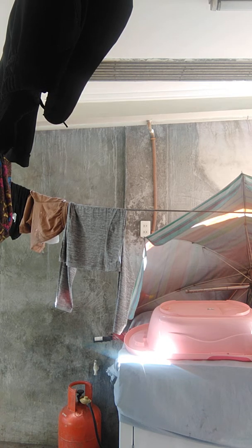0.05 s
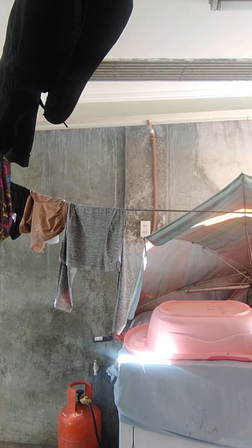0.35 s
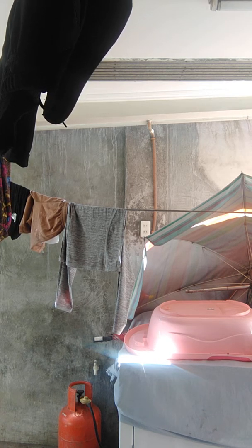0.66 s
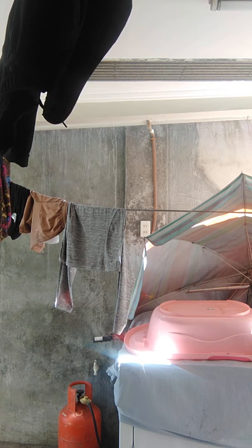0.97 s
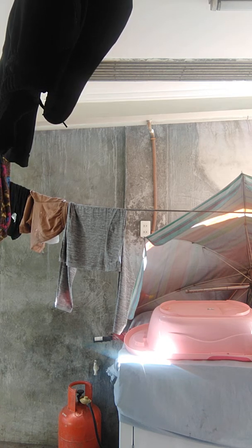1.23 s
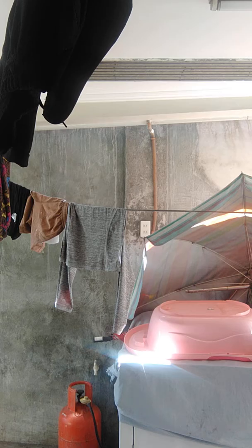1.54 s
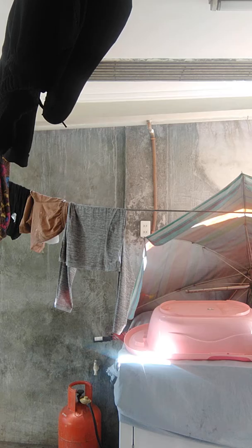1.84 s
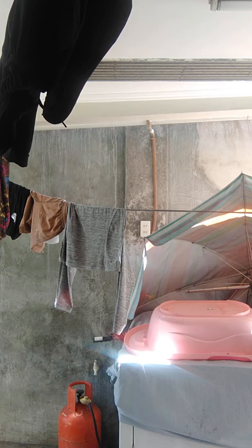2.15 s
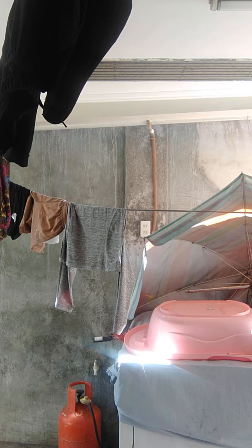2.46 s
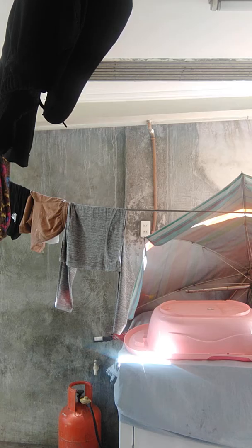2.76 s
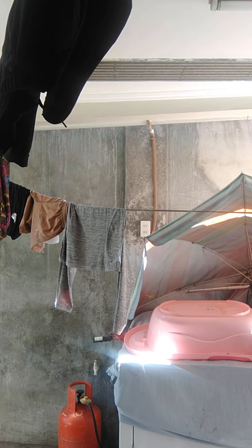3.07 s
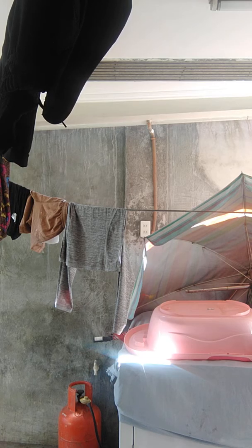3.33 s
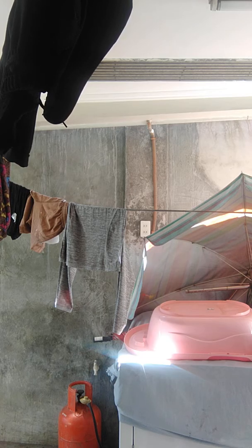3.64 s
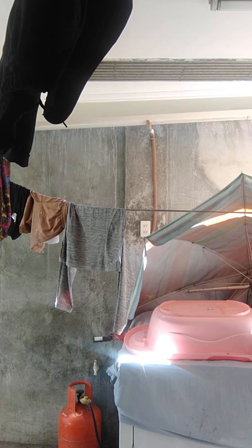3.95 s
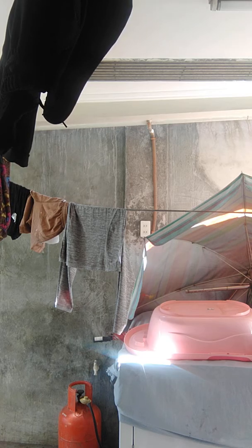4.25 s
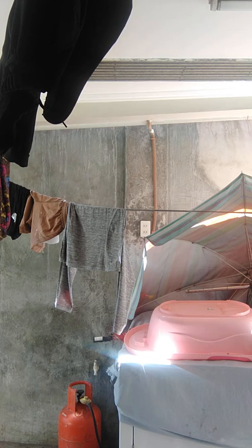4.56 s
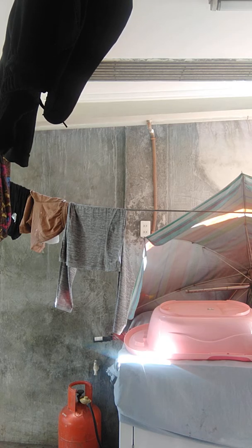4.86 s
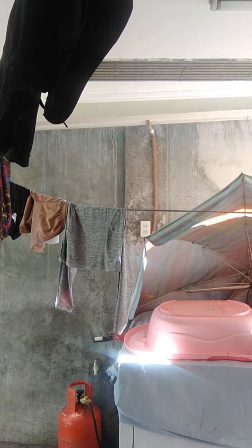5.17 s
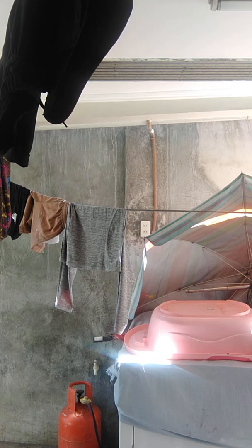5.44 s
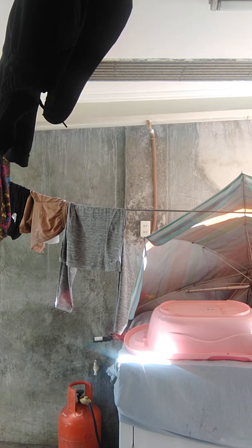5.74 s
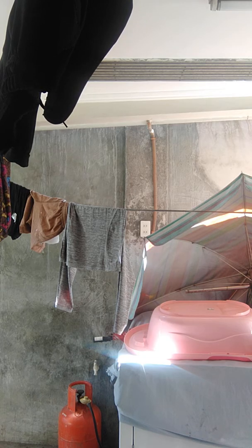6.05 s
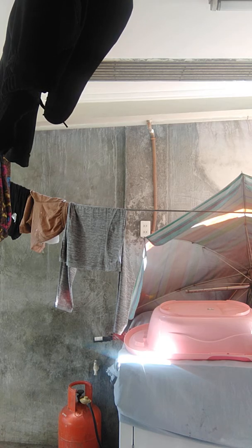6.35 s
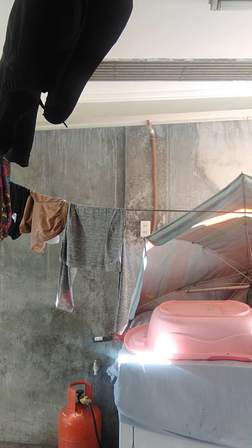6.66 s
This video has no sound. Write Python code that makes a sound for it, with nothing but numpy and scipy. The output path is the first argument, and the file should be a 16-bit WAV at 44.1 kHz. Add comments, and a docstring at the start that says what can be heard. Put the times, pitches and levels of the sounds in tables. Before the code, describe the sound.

Water splashes from the start in uneven spurts, like washing by hand, with sharp slaps, ringing bubbles and a few low glugs in a tub. It eases around 1 second into lighter splashes and a thin, hissing trickle. Something hollow scrapes twice with a slight squeak, low at about 1.5 seconds and higher at 1.8. The splashing picks up at 2 seconds and is fullest from about 2.7 to 3.4, when a heavier stream makes the basin ring. Irregular slaps, bursts of froth and soft glugs continue, with another deeper spurt near 6 seconds and bright splashes until about 7. Stray drops plink on the floor throughout, and a few very faint, brief whistles sound far off over a quiet low rumble. Bare concrete walls add a short echo, and a small microphone gives the water a crisp, bright edge.

```python
"""Water slaps down and dribbles away in uneven spurts: washing by hand in a small concrete yard.
Each spurt traps ringing bubbles, which get smaller and higher as it thins. Froth bursts in the stream,
big air pockets glug low in a tub and a thin trickle runs on. Stray drops plink on the floor,
something hollow scrapes twice and faint whistles sound far off. Bare walls echo it all,
and a small microphone gives the splashes a peak near 8.5 kHz."""
import sys
import numpy as np
from scipy import signal
from scipy.fft import rfft, irfft, next_fast_len
from scipy.io import wavfile
from scipy.ndimage import uniform_filter1d

SR = 44100
rng = np.random.default_rng(int(sys.argv[2]) if len(sys.argv) > 2 else 0)


def materialize(psi):
    """Save the field psi as 16-bit PCM at rate SR to the path in sys.argv[1].

    A 1-D psi becomes a single channel; in a 2-D psi each row is a channel.
    """
    bounded = np.clip(np.atleast_2d(psi).T, -1, 1)
    quanta = np.round(bounded * 32767).astype(np.int16)
    wavfile.write(sys.argv[1], SR, quanta)


N = 304290

# Events. Their levels are relative: the functions turn them up or down for the mix.
# faint whistles and thin rings: t/s, length/s, f/Hz, level/dB
WHISTLES = [(0, 0.022, 1288, -61), (.09, 0.13, 1285, -62.5), (.77, 0.045, 1291, -65),
            (1.128, 0.014, 1035, -60), (1.39, 0.11, 6790, -61), (2.58, 0.023, 1097, -68.5),
            (2.64, 0.048, 1093, -77), (2.98, 0.032, 1084, -64.5), (5.52, 0.101, 1222, -73.5),
            (5.9, 0.23, 1468, -62.5), (6.72, 0.05, 1094, -60), (6.75, 0.18, 8450, -59.5)]
# two scrapes, a low one then a higher one: t/s, rise/s, length/s, level/dB
SCRAPES = [(1.465, 0.051, 0.14, -49), (1.768, 0.0077, 0.044, -47)]
# tones that sing out in the scrapes: t/s, length/s, f/Hz, level/dB
SQUEAKS = [(1.448, .035, 495, -52), (1.46, .04, 1190, -60), (1.465, .035, 2660, -61),
           (1.508, .05, 690, -44), (1.515, .05, 485, -46), (1.57, .13, 697, -49), (1.78, .13, 2850, -58),
           (1.9, .1, 1455, -66)]
# runs of big air pockets in the tub: t/s, length/s, rough f/Hz, level/dB
GLUG_RUNS = [(0.149, .03, 164.6, -43), (0.242, .43, 236.7, -49.5), (0.363, .03, 144.6, -44),
             (.532, .03, 147, -58.5), (.992, .03, 139.6, -54.5), (1.992, .03, 94, -58),
             (2.785, .03, 407, -52.5), (2.943, .24, 253, -60), (2.985, .03, 253, -50),
             (3.427, .03, 260, -55), (3.599, .03, 564, -61.5), (3.605, .14, 250, -51.5),
             (3.939, .07, 255, -60.5), (4.277, .14, 237, -60), (4.719, .08, 85.4, -59),
             (4.804, .08, 233, -59.5), (5.196, .2, 246.4, -52), (5.33, .07, 152, -58),
             (6.243, .03, 261.4, -50.5), (6.379, .03, 236, -54), (6.586, .03, 230, -55)]
# stretches of thin trickle: t/s, length/s, level/dB, ticks over the hiss/dB
TRICKLES = [(0, 0.69, -57.5, -3), (0.71, 0.85, -64.5, 4), (2.093, 2.8, -60.5, -4.5),
            (5.557, 1.3, -64, -6.5)]
# bursts of froth: t/s, rough length/s, f/Hz, pitch spread each way/octaves, level/dB
FROTH_BURSTS = [(.003, .03, 4960, 0.063, -62.5), (0.071, 0.017, 3620, 0.13, -55),
                (0.122, 0.034, 3620, 0.18, -50.5), (0.278, .02, 3820, 0.2, -53),
                (0.36, 0.041, 3340, 0.19, -54), (0.432, 0.022, 3380, 0.27, -56),
                (0.703, 0.01, 4980, 0.034, -63.5), (0.743, 0.014, 6300, 0.042, -55),
                (0.766, 0.023, 3720, 0.024, -62), (0.944, 0.019, 3340, .15, -70),
                (0.96, 0.065, 4970, 0.027, -69), (1.142, 0.018, 3840, 0.013, -75),
                (1.222, 0.022, 5650, 0.028, -68), (1.218, 0.011, 2960, 0.13, -58.5),
                (1.219, .012, 4190, 0.09, -56), (1.215, 0.015, 7130, 0.027, -52.5),
                (1.345, .025, 4960, 0.17, -49.5), (1.574, .07, 3700, .25, -59),
                (1.597, 0.017, 3460, 0.21, -51.5), (2.092, 0.028, 3500, 0.4, -49.5),
                (2.198, .02, 1990, 0.1, -63.5), (2.197, 0.039, 3400, 0.24, -60),
                (2.256, 0.029, 3760, 0.084, -58), (2.287, 0.063, 3190, 0.31, -51.5),
                (2.313, .04, 2300, 0.091, -57), (2.441, 0.022, 3830, 0.11, -50),
                (2.539, 0.066, 3040, 0.305, -49), (2.728, 0.095, 1950, 0.015, -65),
                (2.759, 0.061, 2690, 0.25, -69), (2.921, 0.068, 1980, 0.014, -65),
                (3.04, 0.07, 2460, 0.082, -55), (3.12, .03, 2280, 0.037, -56),
                (3.292, 0.013, 3570, 0.21, -48.5), (3.387, 0.013, 3100, 0.14, -60.5),
                (3.409, 0.01, 5500, 0.42, -39.5), (3.478, 0.018, 4320, 0.085, -49),
                (3.594, 0.041, 3210, 0.48, -64.5), (3.625, 0.016, 6600, 0.067, -46.5),
                (3.712, .012, 6300, 0.16, -46), (3.845, 0.0074, 3600, 0.18, -55),
                (3.88, 0.028, 4020, 0.36, -47), (3.936, .015, 3470, 0.24, -40.5),
                (3.984, 0.014, 3700, 0.063, -56), (4.019, 0.017, 3570, 0.23, -49),
                (4.339, 0.018, 3600, 0.056, -57.5), (4.381, 0.023, 2480, 0.17, -55),
                (4.383, 0.022, 3530, 0.1, -54), (4.432, 0.021, 5720, 0.087, -46),
                (4.502, 0.023, 4750, 0.05, -60), (4.608, 0.045, 2930, 0.081, -62),
                (4.627, .03, 4330, 0.33, -53.5), (4.726, 0.089, 2030, 0.019, -66),
                (4.745, 0.016, 6020, 0.2, -42), (4.755, .045, 3276, 0.047, -57),
                (4.87, 0.029, 1954, 0.031, -65), (4.871, 0.016, 3700, 0.049, -58.5),
                (4.904, 0.031, 3940, 0.12, -51), (4.968, .045, 3780, 0.077, -53),
                (5.085, 0.016, 4040, 0.25, -63), (5.152, 0.042, 2650, 0.044, -72),
                (5.658, .018, 4600, 0.13, -51), (5.961, .035, 3130, 0.29, -44.5),
                (6.03, 0.018, 4450, 0.34, -47), (6.294, 0.04, 4900, 0.18, -42),
                (6.395, 0.038, 2620, 0.19, -59), (6.518, .04, 5540, 0.083, -52),
                (6.743, .06, 5500, 0.11, -65.5)]
# spurts of falling water: t/s, length/s, level/dB, f/Hz of the largest bubbles
SPURTS = [(0, 0.0079, -40.5, 8400), (0.124, 0.27, -39.5, 4700), (0.433, 0.05, -36.5, 4160),
          (0.563, 0.022, -41, 5400), (0.745, 0.018, -37.5, 5960), (0.944, 0.022, -44.5, 6950),
          (1.064, 0.13, -48, 8550), (1.305, 0.0061, -33.5, 10100), (1.347, 0.088, -46, 4200),
          (1.426, 0.29, -49, 8400), (1.596, 0.026, -38, 5940), (2.06, 0.23, -41, 7900),
          (2.312, 0.11, -41, 2750), (2.545, 0.039, -37.5, 7440), (2.612, 0.057, -43, 2540),
          (2.699, 0.086, -38.5, 2870), (2.718, 0.17, -37.5, 2765), (2.949, 0.11, -34.5, 2780),
          (3.046, 0.017, -35.5, 2330), (3.106, 0.092, -32, 3530), (3.16, 0.37, -42, 3900),
          (3.584, 0.25, -41, 5960), (3.748, 0.095, -41, 3820), (3.885, 0.12, -40.5, 3200),
          (4.079, 0.21, -45.5, 8950), (4.234, 0.15, -39.5, 5230), (4.429, 0.22, -43.5, 5430),
          (4.74, 0.14, -41.5, 5150), (4.909, 0.077, -41.5, 4030), (5.127, 0.046, -37, 7040),
          (5.261, 0.1, -36, 3430), (5.496, 0.13, -42.5, 4010), (5.653, 0.08, -49, 4740),
          (5.737, 0.065, -43, 6850), (5.938, 0.015, -46.5, 2970), (5.96, 0.15, -36.5, 2720),
          (6.13, 0.085, -40, 4120), (6.25, 0.051, -33.5, 4800), (6.383, 0.064, -41.5, 4200),
          (6.676, 0.13, -46, 7440)]
# slaps of water and single drops ticking on the floor: t/s, level/dB, crack level/dB, f/Hz of the largest
# bubbles
SLAPS = [(.013, -54.5, 32, 7900), (.062, -37.5, 0, 7500), (.199, -31, 0, 6500), (.218, -44, 18, 6500),
         (.244, -41.5, 25.5, 7700), (.278, -34.5, 0, 3340), (.328, -27.5, 16.5, 7000),
         (.44, -25.5, -4, 4360), (.472, -38.5, 19, 4930), (.572, -30.5, 14.5, 5350),
         (.708, -39, 4, 8040), (.773, -34, 1, 5600), (1.076, -54, 12, 7850), (1.098, -37, 17.5, 6940),
         (1.33, -39.5, 20.5, 8800), (1.372, -35, 19, 8000), (1.55, -45, 10, 6840),
         (2.183, -38, 2, 8200), (2.265, -55, 18, 7000), (2.358, -34, 8, 3200),
         (2.412, -42.5, 17, 3030), (2.618, -49, 4, 5500), (2.82, -39, -4, 3340), (2.93, -29, -6, 5500),
         (2.954, -28, 5, 5730), (3.043, -29.5, 9, 3470), (3.098, -27.5, 4, 4470),
         (3.132, -27, 14, 6400), (3.145, -34, 12, 5900), (3.171, -33, -8, 3530),
         (3.223, -34.5, 19, 6840), (3.276, -32.5, 10, 4400), (3.3, -24, 9, 3760),
         (3.413, -34, 8, 4300), (3.479, -30, 10, 6600), (3.655, -35.5, -3, 5860),
         (3.71, -36, 17.5, 6400), (3.796, -34, 1, 5500), (3.897, -34.5, -5, 4220),
         (3.938, -38.5, 2, 3600), (4.241, -33, 6, 7300), (4.263, -30.5, -4, 4800),
         (4.342, -46, 19.5, 5500), (4.433, -36.5, -1, 5500), (4.498, -36, 4, 6260),
         (4.575, -27, -2, 6240), (4.748, -64, 8, 5300), (4.79, -25.5, 4, 6550), (4.934, -36, 0, 4570),
         (4.966, -36, -6, 4500), (5.215, -37, 12, 7200), (5.272, -32.5, 14.5, 2780),
         (5.442, -43, 17, 7000), (5.504, -33.5, 4, 4150), (5.555, -32.5, 5, 4040),
         (5.571, -41, 23, 3880), (5.646, -46, 12, 5000), (5.738, -49, 11, 6750), (5.798, -41, 8, 6350),
         (6.027, -29.5, 8.5, 2960), (6.09, -34.5, 9, 2870), (6.139, -37.5, 7, 3940),
         (6.293, -37, 9, 4270), (6.308, -50, 16, 4400), (6.361, -35.5, 19.5, 6500),
         (6.396, -30.5, 7, 5500), (6.409, -38.5, 24.5, 6230), (6.477, -33, -14, 4040),
         (6.53, -42.5, -12, 4370), (6.6, -40, 16, 8800), (6.689, -40.5, 19, 7700),
         (6.723, -29, 2, 7440)]

# Tone colours: how strong each frequency is.
QUIET_AIR = [(20, -16), (40, -8), (58, 2), (100, 6), (200, 0.5), (350, -11), (500, -8.5), (1000, -16.5),
             (2000, -22), (4000, -29), (8500, -19), (11000, -16), (15800, -28)]  # the yard's background noise: f/Hz, level/dB
LOW_HOLLOW = [(210, -59), (350, -25), (482, -7), (566, -15), (694, 5), (772, -12.5), (1070, -7),
              (1300, -15), (1560, -13), (1780, -20), (2420, -12), (3480, -36), (5000, -32), (9900, -65)]  # the hollow thing in the low scrape: f/Hz, level/dB
HIGH_HOLLOW = [(500, -30), (720, -10), (920, 10.5), (1030, 2), (1110, -9), (1250, 5.5), (1480, 5.5),
               (1680, 2.5), (1950, 10.5), (2150, -4), (2850, 6.5), (3100, -10.5), (3750, 5), (4150, -43),
               (8000, -70)]  # the hollow thing in the higher scrape: f/Hz, level/dB
TUB_BOOM = [(30, -28), (55, -7), (75, -8), (97, -3), (120, -9), (150, -1), (185, -5), (245, 2), (300, -6),
            (380, -19), (500, -30), (1500, -60)]  # the tub's dull ring: f/Hz, level/dB
TRICKLE_RING = [(4000, -26), (7400, -50), (8100, -3), (8700, 12), (9300, -12.5), (12000, -17.5),
                (15800, -11)]  # the trickle's high ring: f/Hz, level/dB
BASIN_RING = [(300, -26), (450, 8.5), (600, -18), (780, 9.5), (930, -30), (1090, -2), (1300, -16),
              (1580, 2), (1780, -28), (1950, 12), (2080, -1), (2280, 13.5), (2480, 5.5), (2700, 21.5),
              (3300, 4.5), (6000, -46)]  # the hollow of the basin: f/Hz, level/dB
FINE_SPRAY = [(3000, -52), (6500, -46), (8500, -0.5), (11000, 6), (15800, -7.5)]  # the finest droplets: f/Hz, level/dB
HEAVY_SPLAT = [(200, -40), (500, -3), (1100, 25), (1600, -27), (2200, 22), (3000, 11), (6000, -55)]  # the dull body of a heavy stream: f/Hz, level/dB
MICROPHONE = [(2000, -11), (3700, 4.5), (4600, -1), (5500, -0.5), (7000, 1), (8000, 6), (8900, 5.5),
              (9600, -3), (11000, -6), (13000, -13), (15800, -19.5)]  # what the small microphone favours: f/Hz, level/dB
BUBBLE_SWARM = [(.3, -45), (.74, -27.5), (0.889, -10), (0.996, -3.5), (1.499, 0), (2.499, -1.5), (5, -5)]  # many bubbles together: multiple of their lowest pitch, level/dB
# fine drops are too many to favour a pitch, so the treble is smoother: f/Hz, random swing/dB
UNEVENNESS = [(3000, 6), (6000, 4), (9000, 3.5), (12000, 1.5)]
# how long the walls echo: f/Hz, time to fade by 60 dB/s
WALL_ECHO = [(150, 0.33), (700, 0.3), (2500, 0.21), (7000, 0.25), (15000, 0.15)]

WATER_ATTACK_S, WATER_FADE_DB_PER_S = 0.0015, 180  # water starts at once and dribbles away
SCATTER_DB = 3.5  # how much drops and bubbles differ in strength


def amp(db):
    """Turn decibels into a gain to multiply by."""
    return 10 ** (np.asarray(db) / 20)


def unit(x):
    """Scale x to an average strength (rms) of 1."""
    return x / np.sqrt(np.mean(x ** 2) + 1e-20)


def along(points, hz):
    """Read between the rows of an (f/Hz, value) table, on a log frequency axis."""
    f, values = np.transpose(points)
    return np.interp(np.log(hz + 1), np.log(f + 1), values)


def add(track, s, sound):
    """Mix a sound into the track at s seconds."""
    start = int(np.clip(round(s * SR), 0, N - 1))
    track[start:start + len(sound)] += sound[:N - start]


def envelope(age, attack_s, length_s, fade_db_per_s):
    """A gain that rises, holds until the length is over, then dies away."""
    return np.clip(age / attack_s, 0, 1) * amp(-fade_db_per_s * np.maximum(age - length_s, 0))


def colour(x, spectrum, size=8192):
    """Give x a tone colour; white noise keeps its level."""
    cepstrum = irfft(np.log(amp(along(spectrum, np.fft.rfftfreq(size, 1 / SR)))))
    cepstrum[1:size // 2] *= 2  # folded so the filter rings after a hit, never before
    cepstrum[size // 2 + 1:] = 0
    response = irfft(np.exp(rfft(cepstrum)))
    return signal.fftconvolve(x, response / np.linalg.norm(response))[:N]


def crackle(rate, spread_db):
    """Random clicks of random size, about `rate` of them a second."""
    hit = rng.random(N) < rate / SR
    sign = rng.choice([-1, 1], N)
    return unit(hit * sign * amp(spread_db * np.clip(rng.standard_normal(N), -2, 2)))


def tones(rows, waver_hz, softness):
    """Short swelling tones that flutter in pitch and strength."""
    out, flutter_db = np.zeros(N), 2
    for s, length, hz, db in rows:
        progress = np.linspace(0, 1, max(int(length * SR), 2))
        drift, flutter = [np.interp(progress, np.linspace(0, 1, 10), knots)
                          for knots in rng.standard_normal((2, 10))]
        swell = amp(db + flutter_db * flutter) * np.abs(np.sin(np.pi * progress)) ** softness
        add(out, s, swell * np.sin(2 * np.pi * np.cumsum(hz + waver_hz * drift) / SR))
    return out


def bubble(t, hz, cycles, rise, onset):
    """A bubble swells over `onset` cycles, fades 60 dB in `cycles` and climbs as it nears the surface."""
    age = t * hz / cycles
    loudness = amp(-60 * age) * (1 - np.exp(-t * hz / onset))
    return loudness * np.sin(2 * np.pi * hz * t * (1 + rise * age / 2))


def swarm(hz, lowest_hz):
    """The gain of a swarm of bubbles: little rings below the pitch of the largest one."""
    ratio, db = np.transpose(BUBBLE_SWARM)
    return amp(np.interp(np.log((hz + 1) / lowest_hz), np.log(ratio), db))


def yard(x, echo_db, places=24):
    """Add the walls' echo; its pattern changes as the water lands in new places."""
    out, place = np.zeros(N), np.linspace(0, places - 1, N)
    for k in range(places):
        hz, t, noise = signal.stft(rng.standard_normal(SR // 3), SR, nperseg=256)
        tail = signal.istft(noise * amp(-60 * t / along(WALL_ECHO, hz)[:, None]), SR)[1]
        near = np.flatnonzero(np.abs(place - k) < 1)
        part = x[near] * np.cos(np.pi / 2 * (place[near] - k))  # blend one place into the next
        add(out, near[0] / SR + .003, signal.fftconvolve(part, tail / np.linalg.norm(tail)))
    return x + amp(echo_db) * out


def air():
    """Quiet air: a steady low rumble with a little hiss."""
    return amp(-68.5) * colour(rng.standard_normal(N), QUIET_AIR)


def whistles():
    """Faint, wavering whistles far off, and a few thin high rings."""
    return amp(0.5) * tones(WHISTLES, waver_hz=24.2, softness=0.46)


def stray_drops(flow_db, count=380, low_hz=2376, high_hz=7980):
    """Drops, mostly small, plink all over the wet floor; their level loosely follows the flow."""
    out, t = np.zeros(N), np.arange(SR // 20) / SR
    starts = rng.integers(0, N, count)
    for i, smallness, strength in zip(starts, rng.random(count), rng.uniform(-3.1, 3.2, count)):
        hz = low_hz * (high_hz / low_hz) ** np.sqrt(smallness)
        ring = bubble(t, hz, cycles=99, rise=0, onset=0.51)
        add(out, i / SR, amp(-54.5 + .22 * flow_db[i] + SCATTER_DB * strength) * ring)
    return out


def scrapes(fades_db_per_s=(473, 193)):
    """Quick uneven slips shake a hollow thing, which sings at a few pitches."""
    t = np.arange(N) / SR
    low_force, high_force = [amp(db) * envelope(t - start, rise, length, fade)
                             for (start, rise, length, db), fade in zip(SCRAPES, fades_db_per_s)]
    low = low_force * colour(crackle(rate=380, spread_db=-1.5), LOW_HOLLOW)
    high = high_force * colour(crackle(rate=1100, spread_db=-0.5), HIGH_HOLLOW)
    return low + high + tones(SQUEAKS, waver_hz=30, softness=0.23)


def air_pockets(gap_s=.056, jitter_s=0.00702):
    """Air pockets follow each other unevenly in each run; gives rows of t/s, f/Hz, level/dB."""
    rows = []
    for start, length, hz, db in GLUG_RUNS:
        rows.append((start, hz, db))
        for k, (late, pitch, weakness) in enumerate(rng.standard_normal((10, 3)), 1):
            if k * gap_s < length:
                s = start + k * gap_s + jitter_s * late
                rows.append((s, hz * np.exp(0.071 * pitch), db - 5.5 * weakness))
    return rows


def tub(flow_db):
    """Big air pockets glug; each one heaves the water, which also churns under the stream."""
    glugs, heave, t = np.zeros(N), np.zeros(N), np.arange(SR // 3) / SR
    for s, hz, db in air_pockets():
        add(glugs, s, amp(db + 9.0) * bubble(t, hz * 0.979, cycles=16.6, rise=0.21, onset=1.55))
        add(heave, s - .015, amp(db - 12.5) * (1 - np.exp(-t / 0.0027)) * amp(-60 * t / 0.25))
    churn = amp(1.015 * flow_db - 50.0)
    return glugs + (heave + churn) * colour(crackle(rate=330, spread_db=-15.0), TUB_BOOM)


def trickle():
    """A thin thread of water hisses with a high ring and throws sharp little ticks."""
    out, t = np.zeros(N), np.arange(N) / SR
    hiss = colour(crackle(rate=1300, spread_db=10), TRICKLE_RING)
    tick_fade = amp(-60 * t[:SR // 50] / 0.021)
    tick_power = signal.fftconvolve(crackle(rate=65, spread_db=6.0) ** 2, tick_fade)[:N]
    ticks = unit(colour(np.sqrt(np.abs(tick_power)) * rng.standard_normal(N), FINE_SPRAY))
    for start, length, db, tick_db in TRICKLES:
        running = envelope(t - start, WATER_ATTACK_S, length, WATER_FADE_DB_PER_S)
        out += amp(db) * running * (hiss + amp(tick_db) * ticks)
    return out


def basin(flow_db, flow_hz, deep_hz=3015, fade_db_per_octave=36):
    """Only a deep stream, one with big low bubbles, makes the hollow basin ring."""
    octaves_above = np.maximum(np.log2(flow_hz / deep_hz), 0)
    gain = amp(flow_db - 24.5 - fade_db_per_octave * octaves_above)
    return gain * colour(crackle(rate=310, spread_db=6.0), BASIN_RING)


def drips(flow_db, flow_hz, count=300, top_hz=8980):
    """Drops land around the stream; each traps three slightly different bubbles that ring briefly."""
    out, t = np.zeros(N), np.arange(SR // 25) / SR
    starts = rng.integers(0, N, count)
    for i, octaves_up, strength in zip(starts, rng.random(count), rng.uniform(-1.3, 1, count)):
        centre_hz = min(flow_hz[i] * 2 ** octaves_up, top_hz)
        for late, pitch in rng.random((3, 2)):
            ring = bubble(t, centre_hz * 2 ** (.18 * (pitch - .5)), cycles=100, rise=.02, onset=2)
            add(out, i / SR + 0.011 * late, amp(flow_db[i] - 7 + SCATTER_DB * strength) * ring)
    return out


def froth(bubbles=28):
    """Each burst of froth is a huddle of short-lived bubbles of nearly one size."""
    out, t = np.zeros(N), np.arange(SR // 20) / SR
    for s, length, hz, width, db in FROTH_BURSTS:
        burst = np.zeros(SR // 3)
        for late, pitch, strength in rng.uniform(-0.77, 1, (bubbles, 3)):
            ring = bubble(t, hz * 2 ** (1.31 * width * pitch), cycles=83, rise=0.0091, onset=1.7)
            add(burst, length * abs(late) ** 1.3, amp(SCATTER_DB * strength) * ring)
        add(out, s, amp(db) * np.sqrt((length + 0.021) * SR) * burst / np.linalg.norm(burst))
    return out


def flow(step=32, climb_octaves_per_s=4.5, floor_db=-84):
    """The stream's level/dB and lowest bubble f/Hz at each sample; a thinning spurt climbs in pitch."""
    t = np.arange(N) / SR
    start, length, db, hz = np.transpose(SPURTS)[:, :, None]
    age = t[::step] - start
    power = (amp(db) * envelope(age, WATER_ATTACK_S, length, WATER_FADE_DB_PER_S)) ** 2 + 1e-20
    octave = np.log2(hz) + climb_octaves_per_s * np.clip(age - length, 0, .15)
    level_db = 10 * np.log10(power.sum(0) + amp(floor_db) ** 2)
    lowest_hz = 2 ** np.average(octave, axis=0, weights=power)  # the strongest spurt counts most
    return np.interp(t, t[::step], level_db), np.interp(t, t[::step], lowest_hz)


def bubble_cloud(flow_hz, count=4000, size=700):
    """Many small bubbles ring at random times, crowded just above the stream's lowest pitch."""
    start = rng.integers(0, N, (count, 1))
    hz = flow_hz[start] * np.exp(0.59 * np.abs(rng.standard_normal((count, 1))))
    hz = np.minimum(hz, rng.uniform(8500, 12500, (count, 1)))
    strength = amp(-1.5 * np.clip(rng.standard_normal((count, 1)), -2, 1.7)) * np.sqrt(hz)
    rings = strength * bubble(np.arange(size) / SR, hz, cycles=82, rise=0.26, onset=1.0)
    samples = start + np.arange(size)
    return unit(np.bincount(samples.ravel(), rings.ravel(), N)[:N])


def pour(flow_db, flow_hz):
    """The stream patters and traps bubbles; the deeper it digs, the larger and lower they get."""
    hz, t, clicks = signal.stft(crackle(rate=2200, spread_db=5.5), SR, nperseg=256)
    # random patches of pitch and time come out louder or softer
    patches = uniform_filter1d(rng.standard_normal(clicks.shape), size=3, axis=0)
    patches = unit(uniform_filter1d(patches, size=14, axis=1))
    lowest_hz = np.interp(t * SR, np.arange(N), flow_hz)
    gain = swarm(hz[:, None], lowest_hz) * amp(along(UNEVENNESS, hz)[:, None] * patches)
    patter = signal.istft(clicks * gain, SR, nperseg=256)[1][:N]
    bubbles = bubble_cloud(flow_hz)
    # the finest droplets keep ticking when the flow eases
    mist = amp(0.33 * flow_db - 52) * colour(crackle(rate=260, spread_db=0.0), FINE_SPRAY)
    # only a deep, heavy stream has a dull body
    weight = amp(flow_db - 33.0) * (3000 / flow_hz) ** 2
    splat = weight * colour(crackle(rate=130, spread_db=7.5), HEAVY_SPLAT)
    return amp(flow_db) * (amp(-3) * patter + amp(-21.5) * bubbles) + mist + splat


def slaps(size=4096, first_drops_s=0.0035):
    """Each lump of water lands with a crack and a short burst of drops that favours a few pitches."""
    out, t, hz = np.zeros(N), np.arange(size) / SR, np.fft.rfftfreq(size, 1 / SR)
    drops = crackle(rate=7600, spread_db=0.5)
    spurt_heads = [(s, db - 1.5, -7, pitch) for s, _, db, pitch in SPURTS]  # each starts with a slap
    lead_in = size // 16  # room for the sound to build before the blow
    for s, db, crack_db, lowest_hz in SLAPS + spurt_heads:
        snap = rng.choice([-1, 1], size) * amp(-60 * t / .0045) * (1 - np.exp(-t / .0003))
        crack = amp(crack_db + 12.0) * snap / np.linalg.norm(snap)
        scatter = amp(5) * drops[rng.integers(N - size):][:size]
        scatter *= amp(-60 * t / 0.097) * (1 - np.exp(-t / 0.0035))
        scatter = np.roll(scatter, -round(first_drops_s * SR))  # the first drops beat the crack
        shape = swarm(hz, lowest_hz)
        bumps = unit(uniform_filter1d(rng.standard_normal(len(hz)), size=36))
        ring = shape * amp(along(UNEVENNESS, hz) * bumps)
        ring *= np.linalg.norm(shape) / np.linalg.norm(ring)
        burst = np.roll(crack + scatter, lead_in)
        add(out, s - lead_in / SR, amp(db) * irfft(rfft(burst) * ring))
    return out


def scene():
    """Mix the water and the other sounds over quiet air; far things get the most echo."""
    flow_db, flow_hz = flow()
    splashing = amp(-5) * colour(pour(flow_db, flow_hz) + slaps(), MICROPHONE)
    water = yard(splashing + trickle(), echo_db=-9.0)
    ringing = froth() + drips(flow_db, flow_hz) + basin(flow_db, flow_hz)
    water += amp(-4) * yard(ringing, echo_db=-2.5)
    hollow = yard(tub(flow_db) + scrapes(), echo_db=0.0)
    far = yard(whistles() + stray_drops(flow_db), echo_db=2.5)
    return (water + hollow + far + air())[None]


def record(dry, top_hz=15850):
    """Cut away the very highest treble."""
    size = next_fast_len(N + SR // 2)
    kept = np.fft.rfftfreq(size, 1 / SR) < top_hz
    return irfft(rfft(dry, size) * kept, size)[..., :N]


dry = scene()
out = record(dry)
materialize(out)
```